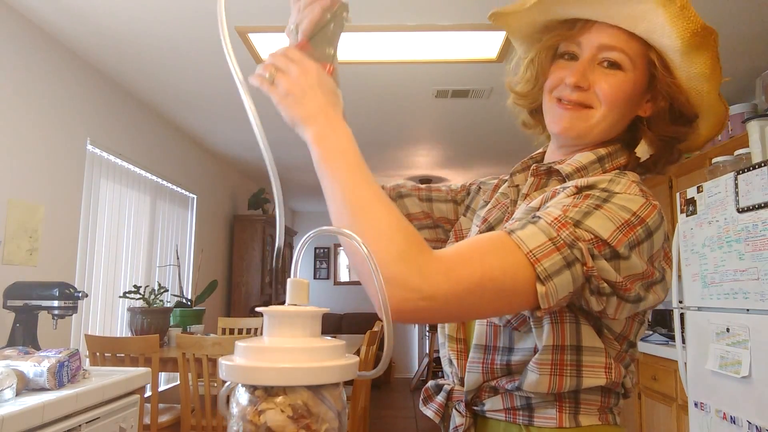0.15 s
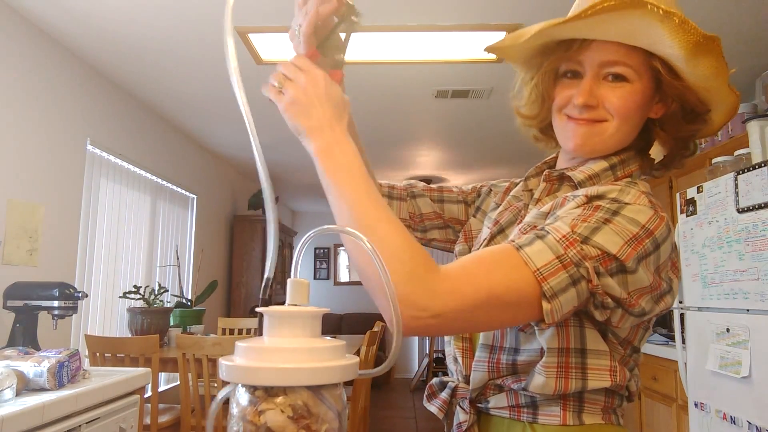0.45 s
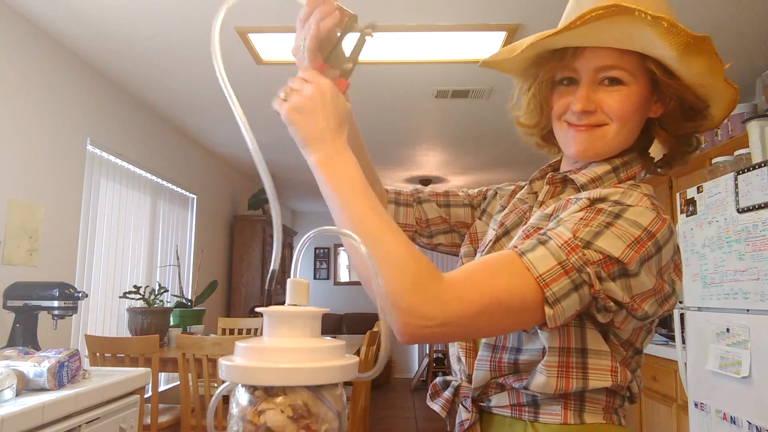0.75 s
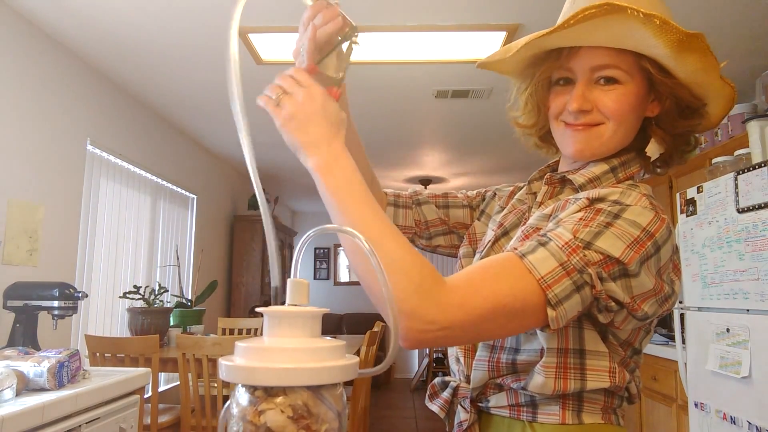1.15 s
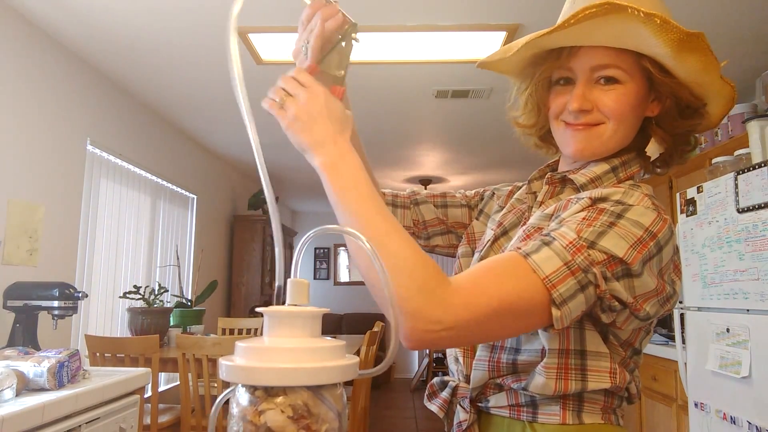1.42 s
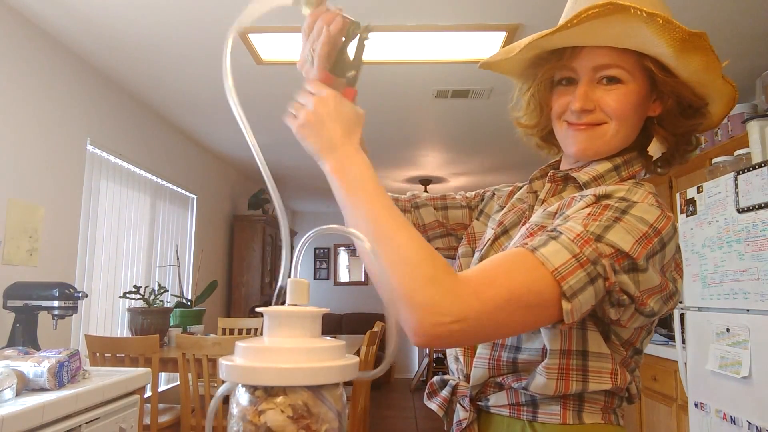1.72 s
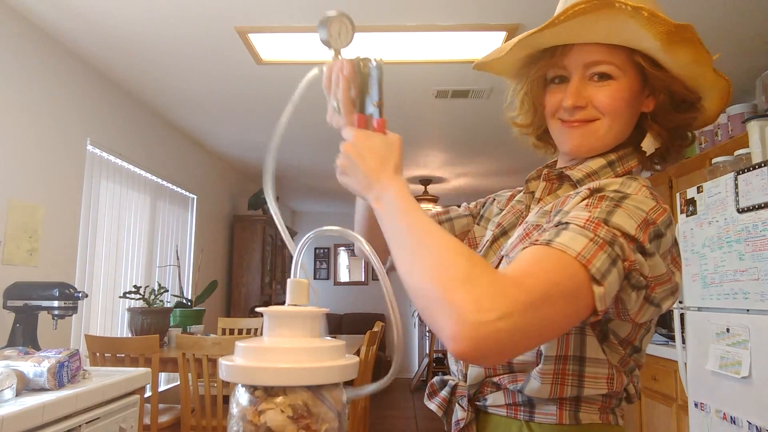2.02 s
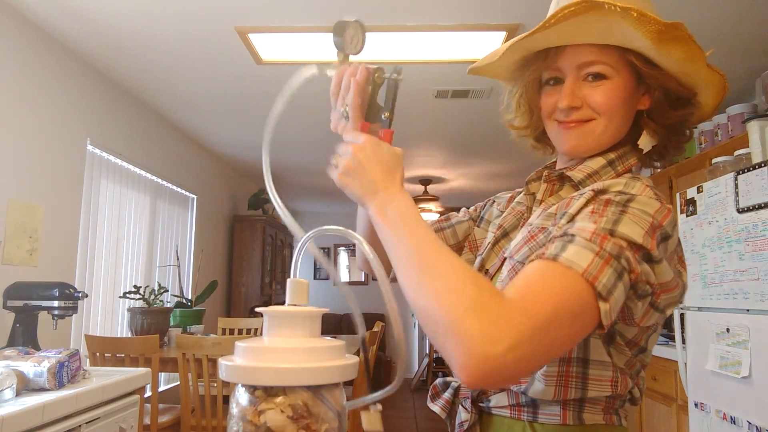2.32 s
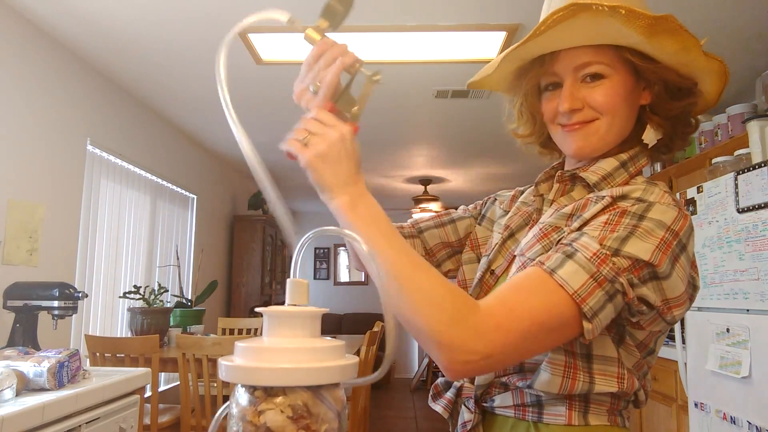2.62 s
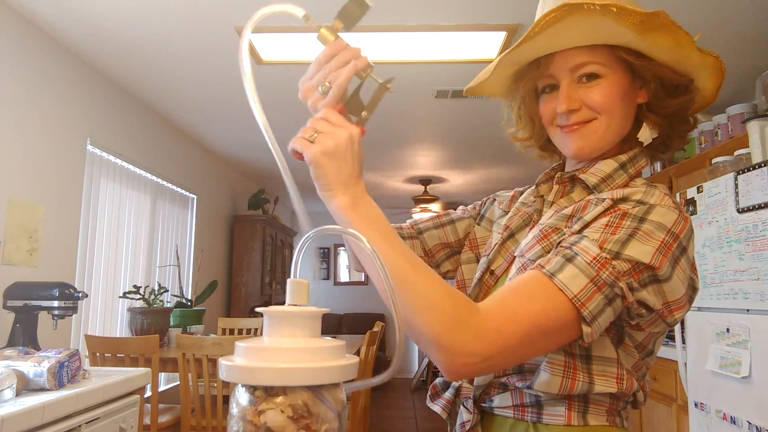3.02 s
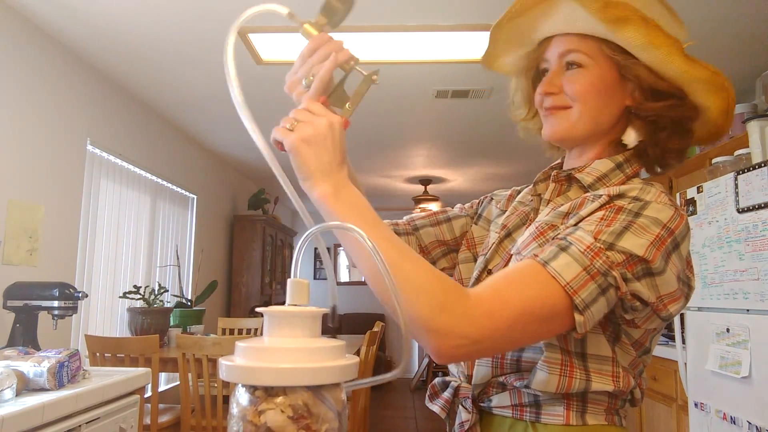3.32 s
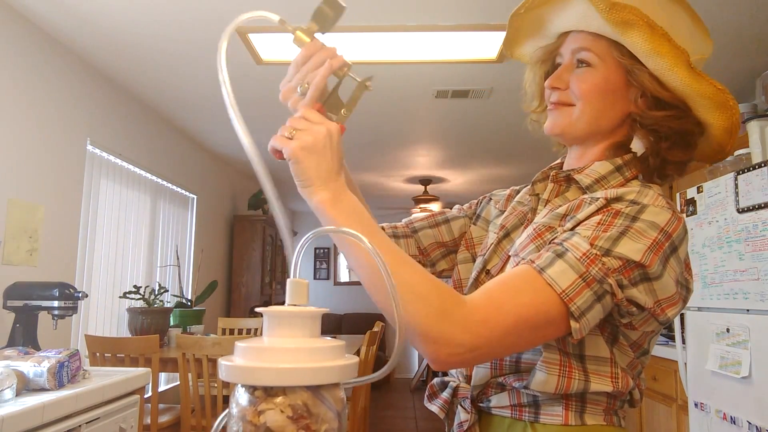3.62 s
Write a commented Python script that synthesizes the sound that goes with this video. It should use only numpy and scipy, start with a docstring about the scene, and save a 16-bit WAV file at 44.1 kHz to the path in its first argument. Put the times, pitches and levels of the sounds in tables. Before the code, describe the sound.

A hand-squeezed pump knocks about four times a second, rattling and hissing in a kitchen.

```python
"""In a kitchen a hand vacuum pump is squeezed about four times a second. Each squeeze ends in a dull plastic
knock: a push and a rebound ring body modes, with a noise crack on top. Random impacts ring the metal lever,
spring and body, shaped noise hisses through the valve, blurred tones squeak at the piston, creak in the spring
and trill as a far bird; noise bursts tick at the latch. A stereo widener delays and flips the treble of one
side."""
import sys
import numpy as np
from scipy import signal
from scipy.fft import rfft, irfft, next_fast_len
from scipy.io import wavfile
from scipy.ndimage import uniform_filter1d

SR = 44100
rng = np.random.default_rng(int(sys.argv[2]) if len(sys.argv) > 2 else 0)


def elevation(decibels):
    """Turn decibel levels (scalar or array-like) into linear amplitude ratios."""
    levels = np.asarray(decibels, float)
    return 10 ** (levels / 20)


def unload_audio(sound):
    """Save the sound as a 16-bit wav file, at the path given as the first command line argument."""
    columns = np.transpose(np.atleast_2d(sound))
    # keep every value between -1 and 1, then stretch to whole-number steps
    steps = np.round(np.clip(columns, -1, 1) * 32767)
    wavfile.write(sys.argv[1], SR, steps.astype(np.int16))


N = 165375

# handle hitting its stop: start_s, peak_db, crack_db (re knock), tilt_db_per_octave (positive = brighter)
KNOCKS = [(0.292, -14.5, -20, 0.5), (0.527, -12.5, -23.5, 0), (0.778, -12.5, -21, 2),
          (1.041, -14, -21, -2.5), (1.279, -11.5, -22, -1.5), (1.529, -15.5, -22.5, -1),
          (1.756, -14, -20.5, -2), (2.009, -14, -19, -5), (2.272, -14, -20.5, -5), (2.551, -13, -23, -5),
          (2.811, -14.5, -34, -5), (3.067, -11, -24, -4), (3.303, -13.5, -24.5, -4), (3.571, -13, -21, -3)]
# spectrum of cracks and clack snaps: freq_hz, level_db
SNAP = [(500, -21), (1200, -7.5), (2000, 0), (4500, 6), (8500, 1.5), (11000, -9.5), (12200, -8),
        (15200, -7), (16300, -15)]


def evened(x):
    """Scales to rms 1."""
    return x / np.sqrt(np.mean(x ** 2) + 1e-20)


def read(points, hz):
    """Interpolates a table on a log frequency axis."""
    f, value = np.transpose(points)
    return np.interp(np.log(hz + 1), np.log(f + 1), value)


def add(mix, start_s, sound):
    """Mixes a sound in at a time."""
    part = mix[max(round(start_s * SR), 0):][:len(sound)]
    part += sound[:len(part)]


def coloured(x, points):
    """Filters by a dB spectrum."""
    gain_db = read(points, np.fft.rfftfreq(len(x), 1 / SR))
    return irfft(rfft(x) * elevation(gain_db), len(x))


def hiss(points, patchy_db):
    """Noise of rms 1 whose spectrum drifts in patches of time and frequency."""
    real, imag, patches = rng.standard_normal((N // 128 + 6, 257, 3)).T
    patches = uniform_filter1d(patches, size=6, axis=0)
    patches = evened(uniform_filter1d(patches, size=14, axis=1))
    level_db = read(points, np.fft.rfftfreq(512, 1 / SR))[:, None] + patchy_db * patches
    spectrum = (real + 1j * imag) * elevation(level_db)
    return evened(signal.istft(spectrum, nperseg=512, noverlap=384)[1][:N])


def ring(modes, tilt_db, spread_db, chance, longest_s):
    """Struck decaying modes, each blow exciting them a little differently; peak 1."""
    t = np.arange(6000)[:, None] / SR
    hz, db, t60_s = np.transpose(modes)
    db = db + tilt_db * np.log2(hz / hz.mean()) + spread_db * chance
    decay = elevation(db - 60 * t / np.minimum(t60_s, longest_s))
    signs = (-1.) ** np.arange(len(hz))
    sound = (decay * np.sin(2 * np.pi * hz * t)) @ signs
    return sound / abs(sound).max()


def whistles(rows, drop_hz, pole_width_hz, steady=.3):
    """Gliding tones blurred by slow complex noise; steady weighs the clear tone against the blur."""
    lead_s, skew = .003, .8  # each starts 3 ms early; skew < 1 peaks before mid-note
    out = np.zeros(N)
    noise = rng.standard_normal((len(rows), 2, 8000))
    pole = np.exp(-np.pi * pole_width_hz / SR)
    for (start_s, length_s, db, hz), pair in zip(rows, noise):
        t = np.arange(0, length_s, 1 / SR)
        slow = signal.lfilter([1], [1, -pole], pair)
        slow = evened(signal.lfilter([1], [1, -pole], slow))
        real, imag = slow[:, -len(t):]
        pitch_hz = hz + drop_hz * (.5 - t / length_s)
        carrier = np.exp(2j * np.pi * np.cumsum(pitch_hz) / SR)
        tone = ((steady + real + 1j * imag) * carrier).real / np.hypot(1, steady)
        swell = np.sin(np.pi * (t / length_s) ** skew)
        add(out, start_s - lead_s, elevation(db) * swell * tone)
    return out


def air():
    """Valve hiss: turbulent noise at a slow level plus a puff around every knock."""
    # slow hiss level: start_s, level_db
    slow_level = [(0, -57), (.06, -61), (.15, -56.5), (.25, -52), (.65, -51), (1.35, -53), (1.7, -53),
                  (2.35, -55.5), (3.75, -52)]
    # hiss spectrum: freq_hz, level_db
    hiss_tone = [(300, 15), (1400, -8), (2000, 12), (4500, 6), (8000, 6), (11000, -3.5), (15000, -6.5),
                 (16000, -10)]
    puff_db, puff_lead_s, puff_rise_s, puff_t60_s = -20.5, .012, .026, .19  # dB re knock peak
    t = np.arange(N) / SR
    level = elevation(np.interp(t, *np.transpose(slow_level)))
    u = t[:SR // 2]
    for start_s, db, *_ in KNOCKS:
        fall = elevation(db + puff_db - 60 * u / puff_t60_s)
        add(level, start_s - puff_lead_s, fall * (1 - np.exp(-u / puff_rise_s)))
    return level * hiss(hiss_tone, patchy_db=2)


def room_tone():
    """Steady background noise of the kitchen, mostly low."""
    # background spectrum: freq_hz, level_db (per Hz)
    spectrum = [(30, -27), (70, -12), (120, -6.5), (486, 1), (740, 3.5), (830, 24), (930, -8), (1500, 0),
                (2000, -2), (3000, -27), (8000, -67), (15000, -63), (16200, -55)]
    return elevation(-51.5) * hiss(spectrum, patchy_db=2)


def clacks():
    """A rattle of tiny impacts rings the lever, spring and pump body and snaps directly."""
    # lever clacks: start_s, level_db, tilt_db_per_octave, rattle_s
    hits = [(0.0158, -49, -8, 0.011), (0.158, -46.5, -4.5, 0.024), (0.225, -42, 2.5, 0.0082),
            (0.425, -42, 3.5, 0.023), (0.525, -60, -20.5, 0.013), (0.5686, -28, -0.5, 0.013),
            (0.6776, -37, 3, 0.012), (0.7724, -37, -19, 0.011), (0.813, -25.5, 1, 0.0082),
            (0.9398, -38.5, 2, 0.0083), (1.036, -46, -7, 0.005), (1.0816, -33, -5.5, 0.011),
            (1.1834, -42, 4, 0.013), (1.3163, -24.5, 1.5, 0.0044), (1.568, -34, -3.5, 0.012),
            (1.6894, -42, -0.5, 0.0035), (1.868, -37.5, -1, 0.0031), (1.927, -42.5, -1, 0.017),
            (2.114, -43.5, -2.5, 0.0094), (2.17, -41.5, 1, 0.022), (2.406, -41.5, -2.5, 0.019),
            (2.453, -40.5, 0.5, 0.02), (2.535, -40, -2, 0.02), (2.71, -44, 0.5, 0.016),
            (2.81, -35.5, 3, 0.0046), (2.9495, -40.5, -0.5, 0.022), (3.2187, -44.5, -1, 0.014),
            (3.4554, -43, -1, 0.018), (3.713, -44.5, 0, 0.03)]
    # lever, spring and body modes (720 and 1040 Hz ring the pump body): freq_hz, level_db, t60_s (capped below)
    clack_modes = [(720, 4, .02), (1040, 7, 0.025), (1750, 6, 0.15), (2074, 7, 0.03), (2272, 3, .04),
                   (2780, -8, .06), (4000, -1.5, 0.054), (4665, -8, 0.032), (6100, -10, .035), (7930, -10, 0.045)]
    longest_s = .07  # damping by the hand
    spread_db, rise_share, snap_db = 3, .15, 1
    out = np.zeros(N)
    chances = rng.standard_normal((len(hits), len(clack_modes)))
    noises = rng.standard_normal((len(hits), 2048, 2))
    t = np.arange(2048) / SR
    for (start_s, db, tilt_db, rattle_s), chance, noise in zip(hits, chances, noises):
        rise = (1 - np.exp(-t / (rise_share * rattle_s))) ** 2
        spiky = noise[:, 0] * np.exp(0.75 * noise[:, 1])
        rattle = np.exp(-t / rattle_s) * rise * spiky
        rung = signal.fftconvolve(rattle, ring(clack_modes, tilt_db, spread_db, chance, longest_s))
        snap = coloured(rattle, [(f, g + tilt_db * np.log2(f / 4000)) for f, g in SNAP])
        # levels set by energy over a nominal length
        add(out, start_s, elevation(db) * rung / np.sqrt((rung ** 2).sum() / (300 + rattle_s * SR)))
        add(out, start_s, elevation(db + snap_db) * snap / np.sqrt((snap ** 2).sum() / (100 + rattle_s * SR)))
    return out


def squeaks():
    """The piston squeaks: husky tones that fall in pitch."""
    # squeaks: start_s, length_s, level_db, pitch_hz (mid-glide)
    rows = [(.16, 0.13, -42.5, 2060), (.425, 0.044, -35.5, 2100), (1.12, 0.17, -41.5, 2270),
            (1.41, 0.05, -39.5, 2286), (1.63, 0.074, -41.5, 2224), (1.87, 0.089, -36, 2095),
            (2.13, 0.074, -38, 1973), (2.555, 0.079, -36.5, 2250), (2.92, 0.037, -35, 2030),
            (2.96, 0.067, -38.5, 1910), (3.43, 0.082, -39.5, 1922), (3.53, 0.085, -40, 1050),
            (3.59, 0.14, -50, 2810)]
    return whistles(rows, drop_hz=120, pole_width_hz=330)


def knocks():
    """A short push and a rebound ring the hollow body; a noise crack rides on top."""
    # pump body modes: freq_hz, level_db, t60_s (capped below)
    body_modes = [(119, -7, 0.087), (187, 2.5, 0.0085), (424.3, 1, 0.03), (580.7, 2, 0.034),
                  (670, 8.5, 0.013), (908, 1, 0.098), (1054, 2, 0.026), (1437, -4, 0.042),
                  (1893, 1.5, 0.035)]
    longest_s = .032  # damping by the hand
    push_s, rebound_s, rebound_db, rebound_spread = .00013, .0044, -1, .04
    crack_rise_s, crack_t60_s = .002, .13
    out = np.zeros(N)
    chances = rng.standard_normal((len(KNOCKS), len(body_modes)))
    grit = coloured(rng.standard_normal(N), SNAP)
    t = np.arange(1500) / SR
    for (start_s, db, crack_db, tilt_db), chance in zip(KNOCKS, chances):
        again_s = rebound_s * (1 + rebound_spread * chance[0])
        push = np.exp(-((t - 3 * push_s) / push_s) ** 2)
        push += elevation(rebound_db) * np.exp(-((t - again_s) / push_s) ** 2)
        body = signal.fftconvolve(push, ring(body_modes, tilt_db, 1, chance, longest_s))
        add(out, start_s, elevation(db) * body / abs(body).max())
        crack = evened(grit[round(start_s * SR):][:len(t)])
        fade = elevation(db + crack_db - 60 * t / crack_t60_s) * np.minimum(t / crack_rise_s, 1)
        add(out, start_s, fade * crack)
    return out


def creaks():
    """The spring creaks briefly as the handle returns: clear tones, rising."""
    # creaks: start_s, level_db, pitch_hz (mid-glide)
    rows = [(.647, -37, 1000), (.9, -37, 1010), (1.393, -38.5, 1000)]
    length_s = .035
    notes = [(start_s, length_s, db, hz) for start_s, db, hz in rows]
    return whistles(notes, drop_hz=-180, pole_width_hz=40, steady=2.5)


def ticks():
    """Dry ticks of the latch: millisecond bursts of wide noise."""
    # ticks: start_s, peak_db
    rows = [(1.055, -22), (2.3154, -17), (2.391, -31), (2.5033, -23.5), (3.3444, -24.5)]
    band_hz, decay_s = (1353, 5560), .00091
    out, t = np.zeros(N), np.arange(600) / SR
    band = signal.butter(2, band_hz, 'band', fs=SR, output='sos')
    bursts = rng.standard_normal((len(rows), 600)) * np.exp(-t / decay_s)
    for (start_s, db), burst in zip(rows, signal.sosfilt(band, bursts)):
        add(out, start_s, elevation(db) * burst / abs(burst).max())
    return out


def bird():
    """A far trill of equally long, husky notes, each rising in pitch."""
    # notes: start_s, level_db, pitch_hz (mid-glide)
    rows = [(2.5481, -38.5, 2830), (2.65, -42.5, 2480), (2.701, -40, 2490), (2.743, -43, 2520),
            (2.807, -57, 2700), (2.869, -43, 2540), (2.9076, -41, 2590), (2.956, -39.5, 2657),
            (2.996, -38.5, 2680), (3.036, -39, 2704), (3.075, -37.5, 2950), (3.1332, -40, 2694),
            (3.178, -36.5, 2343), (3.2233, -36.5, 2670), (3.275, -40.5, 2550), (3.3234, -39, 2560),
            (3.3765, -44.5, 2450), (3.4224, -37.5, 2550)]
    length_s = .036
    notes = [(start_s, length_s, db, hz) for start_s, db, hz in rows]
    return whistles(notes, drop_hz=-350, pole_width_hz=260)


def kitchen(x):
    """Reverb: sparse taps of random sign, each band dying at its own speed; two tails."""
    # decay of the kitchen: freq_hz, t60_s
    decay = [(100, 0.12), (500, 0.37), (1500, 0.57), (4000, 0.84), (12000, 0.18)]
    taps = np.zeros((2, SR // 2))
    at = np.arange(300, SR // 2 - 20, 20)
    at = at + rng.integers(0, 20, (2, len(at)))
    np.put_along_axis(taps, at, rng.choice([-1., 1.], at.shape), 1)
    hz, t, z = signal.stft(taps, SR, nperseg=256)
    fade = elevation(-60 * t / read(decay, hz)[:, None])
    tail = signal.istft(z * fade, SR, nperseg=256)[1]
    return signal.fftconvolve(x[None], tail / np.linalg.norm(tail[0]), axes=1)[:, :N]


def scene():
    """All sources reach one spot; some reverb, air and room tone differ left and right."""
    pump_wet_db, bird_wet_db, apart_db = -10, -11, -19
    pump = knocks() + clacks() + ticks() + squeaks() + creaks()
    song = bird()
    wet, other_wet = kitchen(elevation(pump_wet_db) * pump + elevation(bird_wet_db) * song)
    mid = pump + song + air() + wet + room_tone()
    side = elevation(apart_db) * (other_wet + air() + room_tone())
    return np.array([mid + side, mid - side])


def widened(x):
    """Stereo widener: flips and advances the right treble against the left and thins the left bass."""
    # bass balance: freq_hz, left_minus_right_db
    balance = [(60, -5), (150, -10.5), (300, -1), (700, -0.5), (2000, 0.5)]
    treble_lead_s, bass_lead_rad = .00056, .66
    size = next_fast_len(N + 512)
    hz = np.fft.rfftfreq(size, 1 / SR)
    treble_rad = 2 * np.pi * hz * treble_lead_s - np.pi  # minus pi: flipped
    lead_rad = np.maximum(treble_rad, bass_lead_rad * np.minimum(hz / 300, 1))
    lean_db = read(balance, hz) / 2
    left = elevation(lean_db) * np.exp(-.5j * lead_rad)
    right = elevation(-lean_db) * np.exp(.5j * lead_rad)
    return irfft(rfft(x, size) * np.array([left, right]), size)[:, :N]


def top_cut(x):
    """Nothing passes above the cut-off."""
    return signal.sosfilt(signal.butter(12, 16800, fs=SR, output="sos"), x)


def record(dry):
    """Low cut, high cut and stereo widening give the finished mix."""
    low_cut_hz, top_hz = 103, 15900
    mix = signal.sosfilt(signal.butter(5, low_cut_hz, 'high', fs=SR, output='sos'), dry)
    mix = signal.sosfilt(signal.cheby1(10, 1, top_hz, fs=SR, output='sos'), mix)
    mix = widened(mix)
    return top_cut(mix)


dry = scene()
out = record(dry)
unload_audio(out)
```